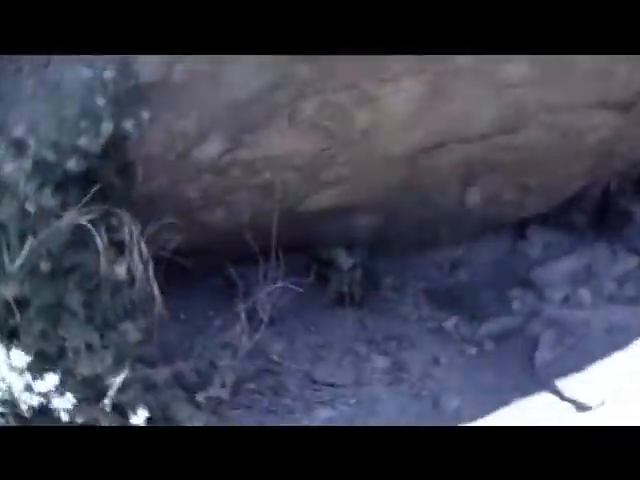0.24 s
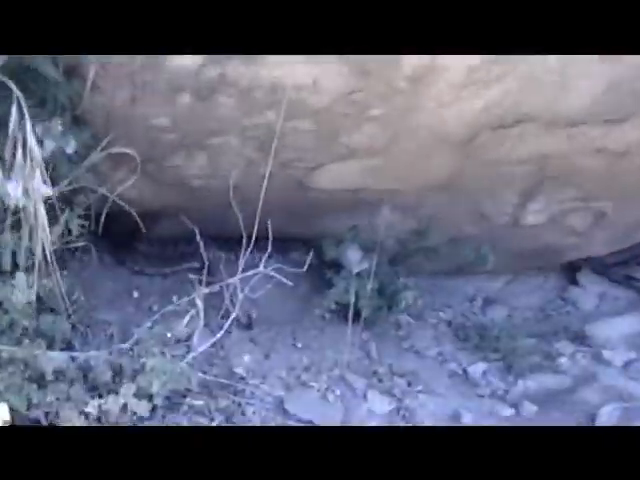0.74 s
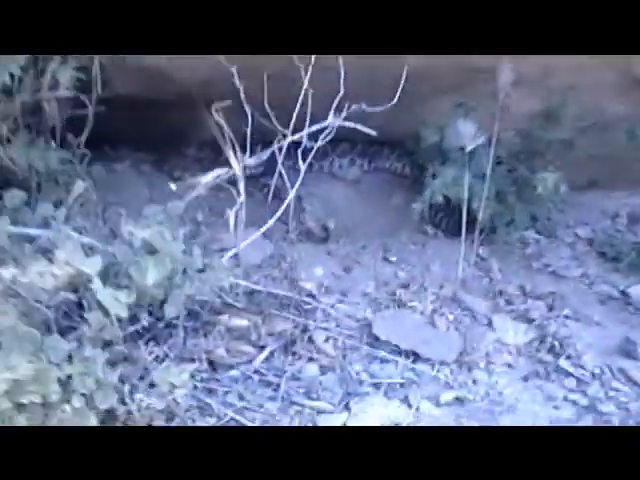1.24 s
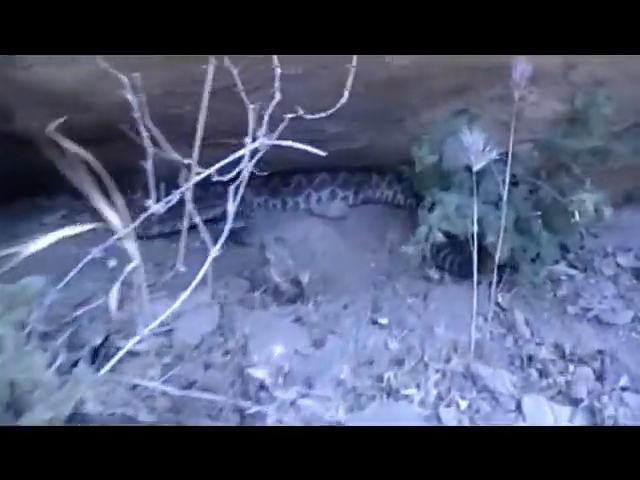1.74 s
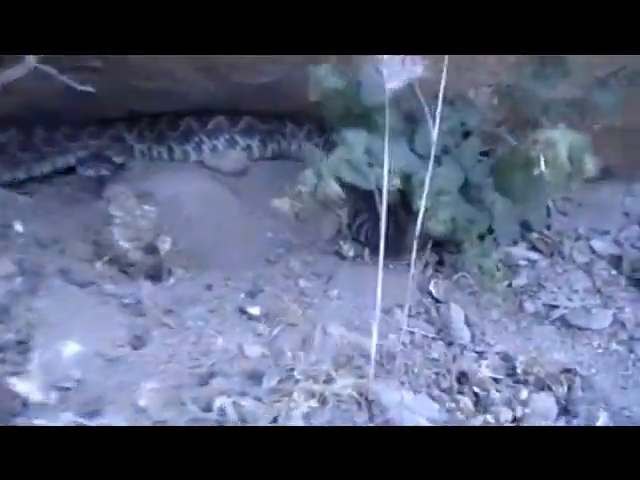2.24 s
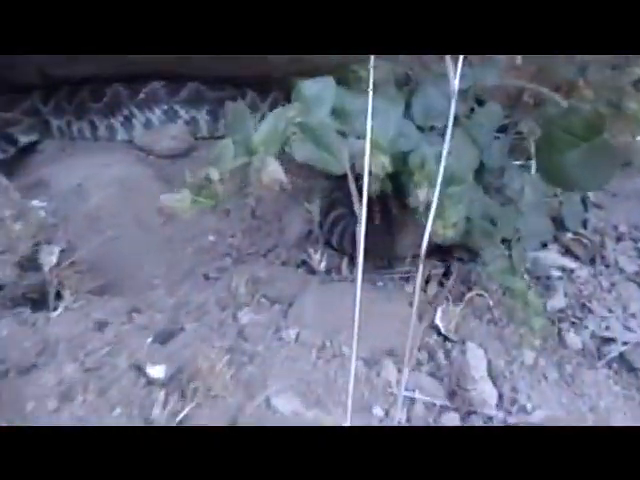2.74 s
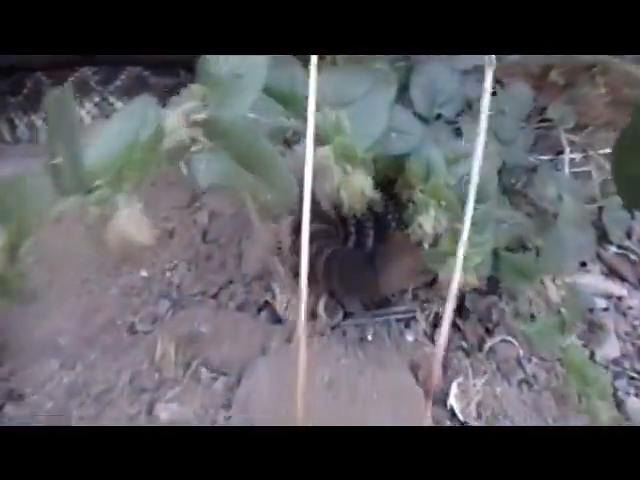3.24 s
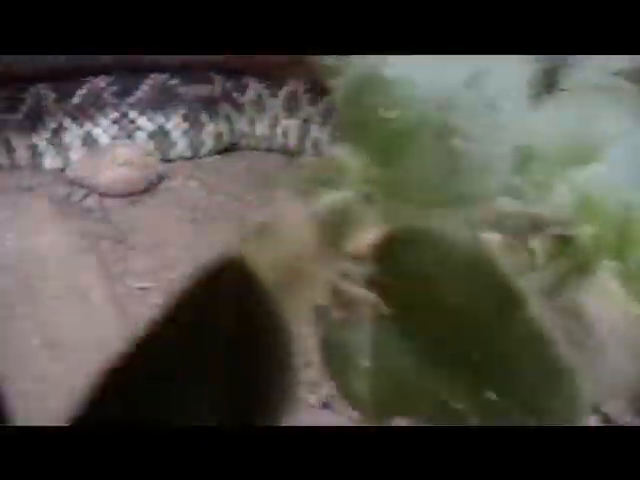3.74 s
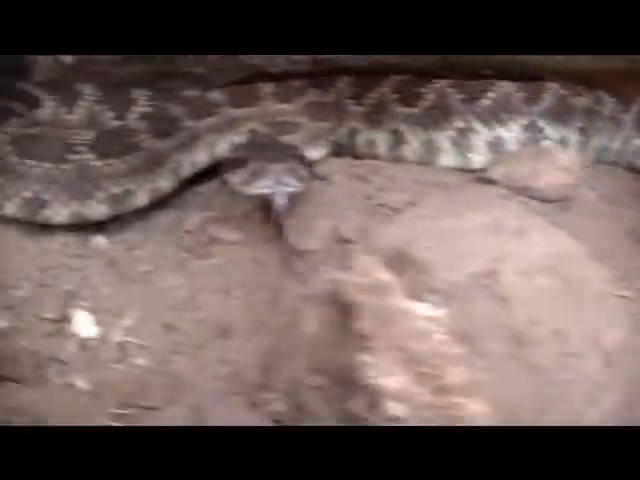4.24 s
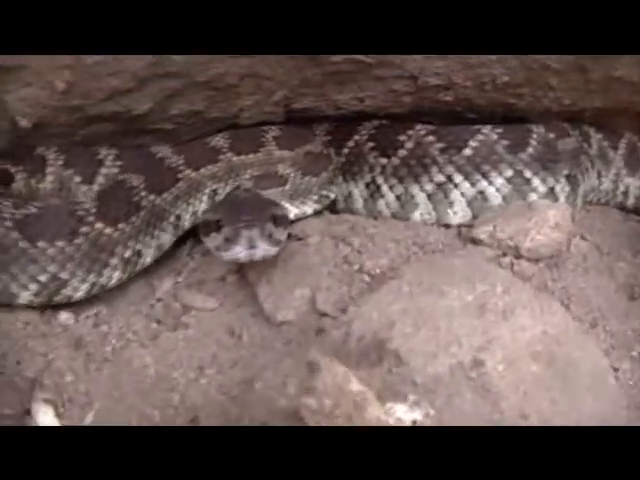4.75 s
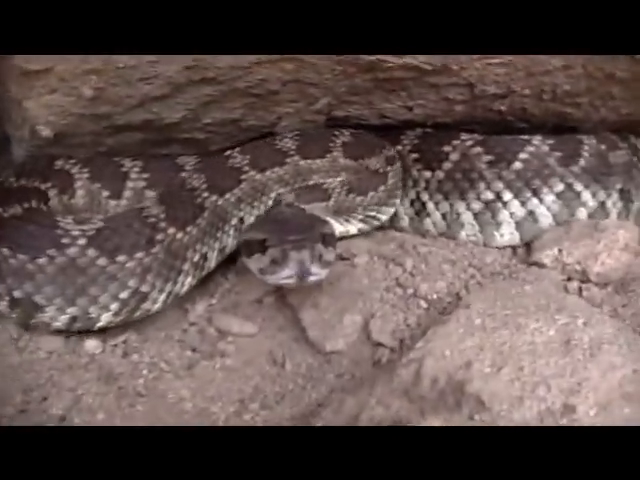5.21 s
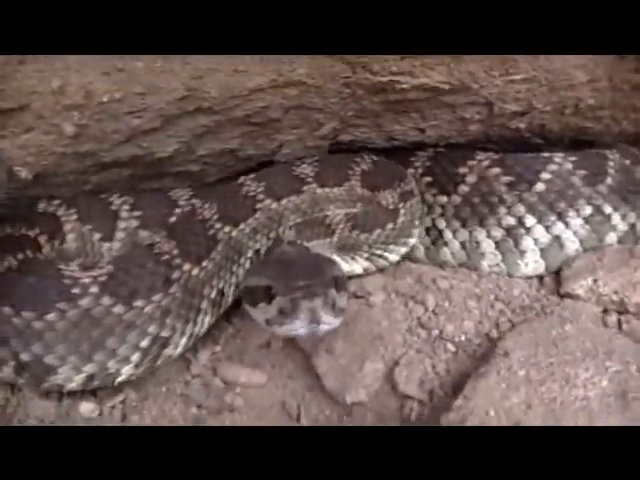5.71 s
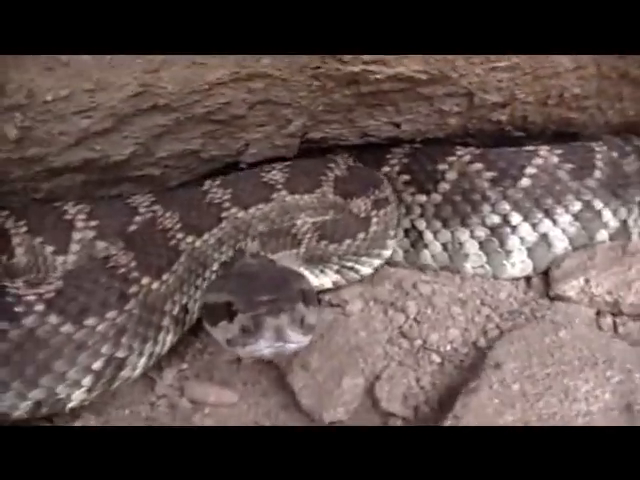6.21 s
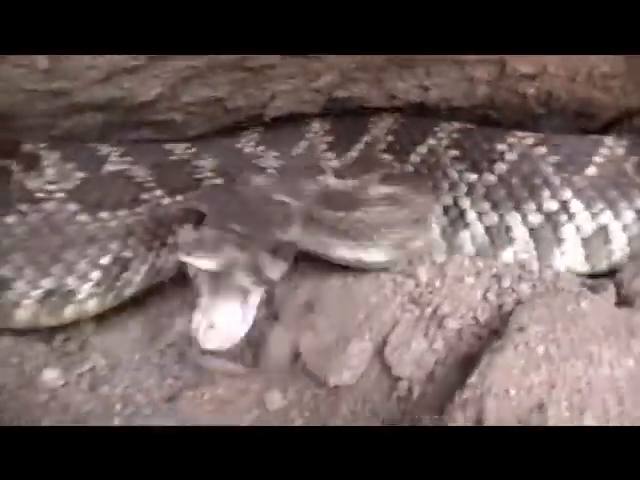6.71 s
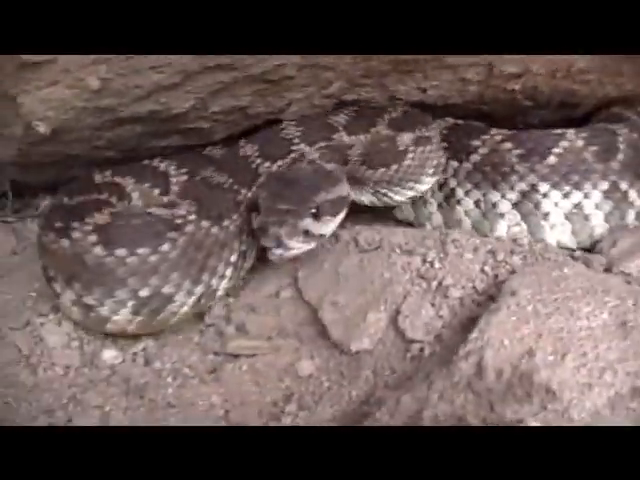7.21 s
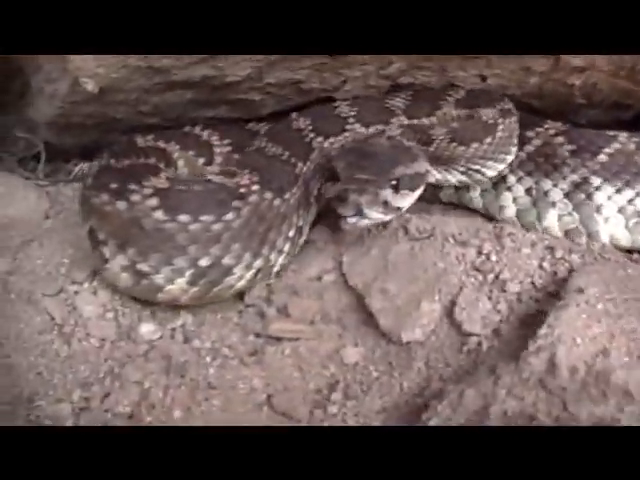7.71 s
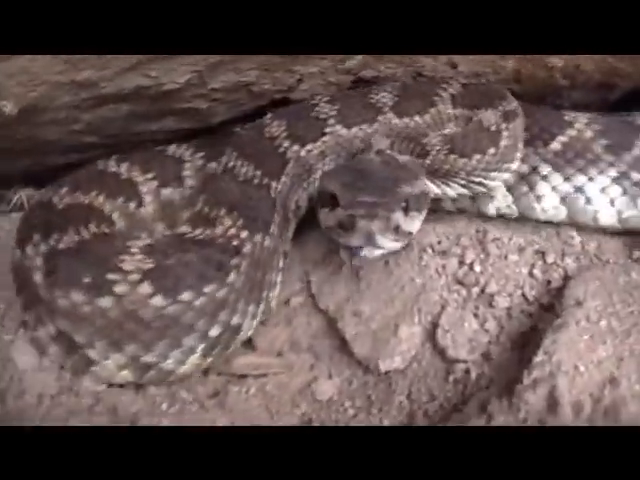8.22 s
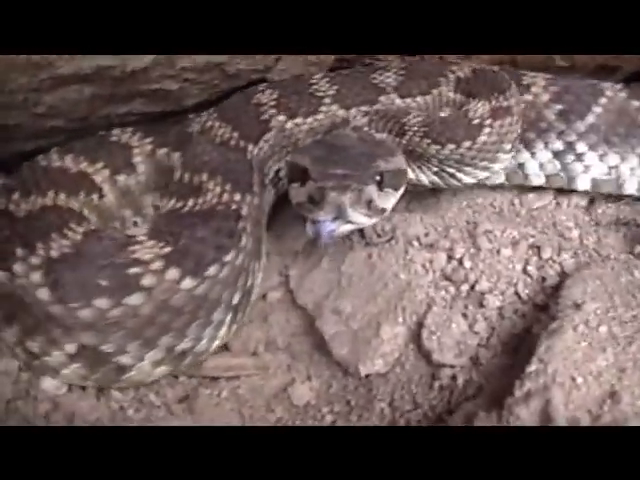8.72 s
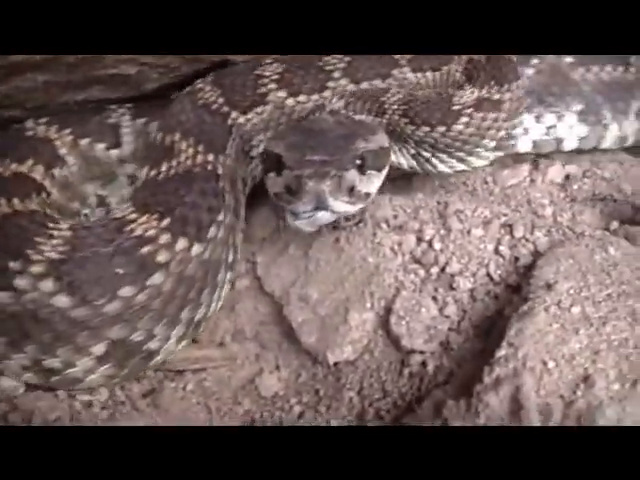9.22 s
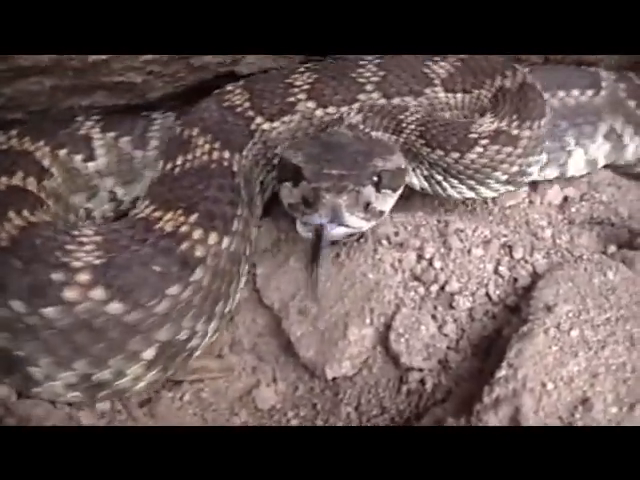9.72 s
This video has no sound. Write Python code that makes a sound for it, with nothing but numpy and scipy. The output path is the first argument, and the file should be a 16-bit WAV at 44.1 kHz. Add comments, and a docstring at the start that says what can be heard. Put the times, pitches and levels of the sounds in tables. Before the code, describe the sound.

Outdoors under a rock ledge, a rattlesnake shakes its tail nonstop: a fast, dry, bright buzz like hissing seeds. It starts thinner and farther away, then grows louder over the first few seconds as the handheld microphone approaches. Faint low air rumble, handling murmurs and tiny dirt scuffs lie beneath. After six seconds a very short, hard clatter strikes near the microphone, the level dips for an instant, and the rattle continues.

```python
"""A rattlesnake under a rock ledge shakes its tail without a pause while a hand-held camera creeps up to it.
Hollow horny segments clash on every stroke: each clash is a click and a dying spray of noise.
Echoes off ground and rock are drawn as notches that slide through the buzz.
The snake strikes once: noise cracks and ringing modes of the casing, and gain control ducks for a moment.
Behind it lie lumpy noise from moving air, scuffs on the dirt, murmurs of the hand and one faint tone."""
import sys
import numpy as np
from scipy import signal
from scipy.io import wavfile
from scipy.ndimage import uniform_filter1d

SR = 44100
rng = np.random.default_rng(int(sys.argv[2]) if len(sys.argv) > 2 else 0)


def transcribe(signal):
    """Save signal, clipped to [-1, 1], as a 16-bit WAV file at the path in sys.argv[1]."""
    frames = np.atleast_2d(signal).T
    limited = np.clip(frames, -1, 1)
    pcm = np.round(limited * 32767).astype(np.int16)
    wavfile.write(sys.argv[1], SR, pcm)


N = 439236
TIME = np.arange(N) / SR


def gain_of(db):
    """Decibels to amplitude."""
    return 10 ** (np.asarray(db) / 20)


def evened(x):
    """Scales to rms 1."""
    return x / np.sqrt(np.mean(x ** 2) + 1e-20)


def steadied(voice, window_s=.2):
    """Holds the running rms of the mid channel at 1."""
    power = uniform_filter1d(voice[0] ** 2, round(window_s * SR))
    return voice / np.sqrt(abs(power) + 1e-14)


def curves(rows, t=TIME):
    """Each column of a table, joined by straight lines in time."""
    s, *columns = np.transpose(rows)
    return [np.interp(t, s, column) for column in columns]


def outline(points, hz):
    """Reads a (Hz, dB) outline on a log-frequency axis."""
    f, db = np.transpose(points)
    return np.interp(np.log(hz + 1), np.log(f), db)


def coloured(x, points, size=4096):
    """Causal minimum-phase filter with the given outline."""
    log_gain = np.log(gain_of(outline(points, abs(np.fft.fftfreq(size, 1 / SR)))))
    taps = np.fft.ifft(np.exp(signal.hilbert(log_gain).conj())).real
    return signal.oaconvolve(x, taps[:size // 2])[:len(x)]


def bell(x, centre, width):
    """Bell curve of height 1."""
    return np.exp(-.5 * ((x - centre) / width) ** 2)


def swell(s, length):
    """A smooth rise and fall around a moment."""
    return np.cos(np.pi * np.clip((TIME - s) / length, -.5, .5)) ** 2


def wander(t, per_s, size=256):
    """Random drift of about unit size, with a new value so many times a second."""
    return np.interp(t * per_s, np.arange(size), rng.standard_normal(size))


def add(mix, s, sound):
    """Mixes a sound in at a time."""
    part = mix[round(s * SR):][:len(sound)]
    part += sound[:len(part)]


def low_noise(colour, apart=0.18, left_db=1, right_db=-1):
    """Soft noise, nearly alike at both ports and stronger at the left one."""
    mid, side = (evened(coloured(rng.standard_normal(N), colour)) for _ in range(2))
    left = gain_of(left_db) * (mid + apart * side)
    right = gain_of(right_db) * (mid - apart * side)
    return np.array([left, right])


# colour of the low air rumble: pitch_hz, level_db
RUMBLE_COLOUR = [(20, -24), (50, -16.5), (90, -5), (115, -6), (143, 2), (190, -1.5), (260, -2.5),
                 (340, -17), (600, -31.5)]
# colour of the softer rustle above it: pitch_hz, level_db
RUSTLE_COLOUR = [(180, -36.5), (290, 1), (325, 2), (365, 0.5), (480, -1), (650, -5.5), (900, -8),
                 (1400, -25.5), (3000, -24)]
# soft swells of air and handling noise: middle_s, length_s, rumble_db, rustle_db
AIR_SWELLS = [(0.277, 0.78, -68, -48), (1.207, 3.5, -58, -52), (1.762, 1.4, -53, -53),
              (2.296, 0.44, -52, -46.5), (2.794, 1.4, -51.5, -55.5), (4.884, 0.91, -48.5, -58),
              (6.126, 0.45, -55, -65), (8.804, 3.6, -53.5, -51), (9.5, 0.88, -48, -57)]
RUMBLE_FLOOR_DB, RUSTLE_FLOOR_DB = -54, -59.5
GUST_DB, GUSTS_PER_S = 2.5, 14  # the low noise comes in small lumps


def air():
    """A low rumble and rustle of filtered noise, with lumpy swells from moving air."""
    rumble_power, rustle_power = gain_of(RUMBLE_FLOOR_DB) ** 2, gain_of(RUSTLE_FLOOR_DB) ** 2
    for s, length, rumble_db, rustle_db in AIR_SWELLS:
        shape = swell(s, length)
        rumble_power = rumble_power + (gain_of(rumble_db) * shape) ** 2
        rustle_power = rustle_power + (gain_of(rustle_db) * shape) ** 2
    gusts = gain_of(GUST_DB * wander(TIME, GUSTS_PER_S))
    rumble = np.sqrt(rumble_power) * low_noise(RUMBLE_COLOUR)
    rustle = np.sqrt(rustle_power) * low_noise(RUSTLE_COLOUR)
    return gusts * (rumble + rustle)


# one faint tone: middle_s, length_s, pitch_hz, level_db (rms at the top of the swell)
FAINT_TONE = (3.2, 2.2, 275, -58)


def faint_tone():
    """A soft sine that swells and fades."""
    s, length, hz, db = FAINT_TONE
    return gain_of(db) * np.sqrt(2) * swell(s, length) * np.sin(2 * np.pi * hz * TIME)


# the hand shifts on the camera and the casing murmurs: middle_s, length_s, pitch_hz, level_db (before the port gains)
HAND_SHIFTS = [(.25, 0.78, 245, -46), (0.303, 0.62, 547, -46), (1.75, 0.78, 175, -49),
               (2.55, .45, 179, -50), (2.95, 0.64, 130.6, -48), (4.88, .55, 365, -52.5),
               (8.9, 2.2, 305, -55)]
GRIP_VALUES_PER_S = 70  # random levels per second, which blur each pitch into a narrow band


def grips(left_db=1, right_db=-3):
    """Each shift of the hand is a narrow rumble: a sine at its own pitch with a randomly wandering level."""
    rumble = np.zeros(N)
    for s, length, hz, db in HAND_SHIFTS:
        blurred = wander(TIME, GRIP_VALUES_PER_S, size=2048) * np.sin(2 * np.pi * hz * TIME)
        rumble += gain_of(db) * np.sqrt(2) * swell(s, length) * blurred
    return gain_of([[left_db], [right_db]]) * rumble


# small scuffs on the dirt: start_s, level_db, length_s
DIRT_SCUFFS = [(1.4, -45, 0.087), (1.512, -47, 0.031), (1.894, -44, 0.036), (2.01, -43, 0.025),
               (2.257, -51, 0.066), (8.021, -46, 0.049)]
# colour of the gritty dirt: pitch_hz, level_db
DIRT_COLOUR = [(80, -18), (200, -16), (600, 1), (900, -3), (1400, 2), (3000, -22), (8000, -35)]


def scuffs():
    """Short gritty swells of noise from the dirt."""
    envelope = np.zeros(N)
    for s, db, length in DIRT_SCUFFS:
        add(envelope, s, gain_of(db) * np.hanning(round(length * SR)))
    return envelope * evened(coloured(rng.standard_normal(N), DIRT_COLOUR))


# the strike clatters on the camera, before the colour and the trims in strike():
# start_s, crack_db, thump_db, crack_decay_ms (time constant), crack_treble_db
STRIKE_KNOCKS = [(6.427, 8, -7, 2, -8), (6.431, 11, -3, 1.4, -11), (6.4345, -2, -3, 4, 0),
                 (6.4402, 5, -6, 1.3, -2), (6.442, 8, -4, 1.4, 1), (6.4445, -1, -14, 5, 0),
                 (6.4492, 4, -17, 1.4, -2), (6.4507, 8, -11, 1.1, -2), (6.4532, 6, -9, 1.2, -2),
                 (6.4555, 3, -21, 4.5, -6), (6.4685, 2, -21, .9, 1)]
# colour of the cracks: pitch_hz, level_db
CRACK_COLOUR = [(100, -9), (480, -10), (800, -13), (1400, -5), (2200, -17), (2700, -9), (4300, -1.5),
                (5500, -5.5), (7700, -7.5), (9500, -4), (13000, -13)]
# ringing modes of the camera casing: pitch_hz, level_db, t60_s
CASING_MODES = [(142, -4, .038), (240, -10, .025), (335, -6.5, .042), (450, -12, .03), (900, -22, .049),
                (1350, -11, .0088)]
TREBLE_HZ = 5260  # the treble of a crack lies above this


def strike(crack_db=0.0, thump_db=1, left_db=2, right_db=-4, right_lag_rad=0.45, low_cut_hz=110, size=4000):
    """A quick cluster of noise cracks, each of which also rings the camera casing, most of all at the left port."""
    t, cracks, thumps = TIME[:size], np.zeros(N), np.zeros((2, N))
    rings = []
    for port_db, lag in ((left_db, 0), (right_db, right_lag_rad)):
        modes = [gain_of(db - 60 * t / t60) * np.sin(2 * np.pi * hz * t - lag) for hz, db, t60 in CASING_MODES]
        rings.append(gain_of(port_db) * sum(modes))
    below = signal.butter(6, TREBLE_HZ, fs=SR, output="sos")
    for s, sharp_db, dull_db, decay_ms, treble_db in STRIKE_KNOCKS:
        crack = rng.standard_normal(size) * np.exp(-1000 * t / decay_ms)
        body = signal.sosfiltfilt(below, crack, padtype=None)
        treble = crack - body
        add(cracks, s, gain_of(sharp_db) * (body + gain_of(treble_db) * treble))
        for port, ring in zip(thumps, rings):
            add(port, s, gain_of(dull_db) * ring)
    thumps = signal.sosfilt(signal.butter(2, low_cut_hz, "high", fs=SR, output="sos"), thumps)
    return gain_of(crack_db) * coloured(cracks, CRACK_COLOUR) + gain_of(thump_db) * thumps


# alarms that quicken the tail: start_s, added_strokes_per_s, rise_s
TAIL_ALARMS = [(.25, 4.47, 0.49), (3.6, 4.22, 0.42), (4.551, 2.6, 0.33), (6.42, 8.5, .08),
               (7.499, 1.96, 0.98)]
# tail strokes, two to a full shake: a resting pace, to which the tail sinks back after each alarm
REST_STROKES_PER_S, CALM_S = 107, .5


def pace():
    """Tail strokes per second: each alarm speeds the tail up, then it calms exponentially."""
    strokes_per_s = np.full(N, float(REST_STROKES_PER_S))
    for s, added, rise in TAIL_ALARMS:
        quicken = np.clip((TIME - s) / rise, 0, 1)
        calm = np.exp(-np.maximum(TIME - s - rise, 0) / CALM_S)
        strokes_per_s += added * quicken * calm
    return strokes_per_s


# segment clashes within one shake, out and back: share_of_shake, crisp_db, bright_db, hollow_db
SHAKE_CLASHES = [(.03, 1, -5, -10), (.092, -1.5, 3, -3), (.17, -4.5, -5, 3), (.262, 0, -2, -7),
                 (.53, 1, -5, -9), (.592, -1.5, 3, -4), (.67, -4, -5, 2), (.762, 0, -2, -6)]
# the tail favours first the outward stroke, later the return:
# time_s, accent_db (gain of the outward opening clashes and loss of the returning ones)
STROKE_ACCENT = [(4.3, 1.45), (5.2, -1.5)]
OPENING_SHARE = .25  # clashes this early in a stroke open it


def clashes(jitter=.005, stroke_jitter=.003, clash_db=.4, stroke_db=.4):
    """Sample index and random force of each clash, one row per shake; jitters are shares of a shake."""
    shakes = np.cumsum(pace() / 2) / SR
    count, share = int(shakes[-1]) + 1, np.transpose(SHAKE_CLASHES)[0]
    # chance for each clash, then for each whole shake
    slip, force = rng.standard_normal((count, 2, len(SHAKE_CLASHES))).transpose(1, 0, 2)
    late, vigour = rng.standard_normal((2, count, 1))
    due = np.arange(count)[:, None] + share + jitter * slip + stroke_jitter * late
    at = np.searchsorted(shakes, due)
    opening = share * 2 % 1 < OPENING_SHARE
    outward = np.sign(.5 - share)
    accent_db = opening * outward * curves(STROKE_ACCENT, at / SR)[0]
    heard = (at < N) * (at > 0)
    return np.minimum(at, N - 1), gain_of(accent_db + clash_db * force + stroke_db * vigour) * heard


def shell(at, force, decay_s, scrape_db, click_db, alike=False):
    """Each clash is a clean click and a quickly dying spray of noise, with faint scraping between; mid and side.
    Clicks that push alike on every shake add up to faint overtones of the tail's pace."""
    blows = np.bincount(at.ravel(), force.ravel() ** 2, N)
    power = signal.lfilter([1], [1, -np.exp(-2 / (decay_s * SR))], blows)
    level = np.sqrt(power / power.mean() + gain_of(scrape_db) ** 2)
    spray = level * rng.standard_normal((2, N))
    push = rng.choice([-1, 1], (2, N))
    if alike:
        push[0] = 1
    return spray + gain_of(click_db) * evened(np.sqrt(blows)) * push


# the echo off the ground as the camera moves: time_s, lag_ms behind the direct sound, strength (share of depth)
GROUND_ECHO = [(0, .455, .2), (.75, .47, .6), (1.2, .476, .65), (1.7, .485, .75), (2.4, .487, .5),
               (2.6, .52, .1), (2.95, .64, .1), (3.2, .66, .45), (3.8, .668, .5), (4.0, .6, .5),
               (4.2, .51, .6), (4.42, .445, .7), (4.7, .447, .7), (5.0, .393, .75), (5.7, .369, .75),
               (6.35, .37, .9), (6.6, .368, .7), (6.9, .395, .6), (7.5, .395, .8), (7.85, .38, .95),
               (8.3, .378, .7), (8.75, .347, .45), (9.96, .342, .5)]
# it cancels pitches that it delays by about an odd number of half cycles: lag_cycles, half_width_cycles, depth_db
GROUND_COMB = [(2.56, .075, 11), (3.47, .075, 11), (5.24, .08, 6)]
# close to the snake all ground notches but the first fade: time_s, share
UPPER_COMB_FADE = [(4.9, 1), (5.8, 0.035)]
# sliding notches, depths before wavering and ECHO_DEPTH; each: time_s, centre_hz, half_width_hz, depth_db
# (a depth below 0 is silent); two from the overhanging ledge and the rocks around
LEDGE = [(0, 11400, 600, 8), (.75, 10700, 400, 7), (1.0, 9300, 280, 8), (1.22, 8000, 170, 11),
         (1.6, 8150, 200, 8), (2.0, 7850, 170, 9), (2.3, 7950, 190, 9), (2.65, 7400, 190, 11),
         (3.2, 7050, 160, 11), (3.75, 7000, 160, 11), (4.0, 7500, 190, 10), (4.33, 9250, 230, 7),
         (4.65, 9700, 230, 5), (5.0, 11300, 240, 7), (5.5, 11500, 240, 4), (5.9, 12500, 240, 0)]
SLAB = [(.5, 12600, 250, 2), (1.0, 11400, 230, 6), (1.35, 10350, 200, 6), (1.9, 9800, 200, 6),
        (2.35, 8600, 260, 6), (2.7, 8300, 350, 4), (3.2, 8050, 300, 6), (3.75, 7900, 300, 6),
        (4.2, 10400, 250, 3), (4.6, 12300, 250, 2), (5, 12800, 250, 0)]
# a third from the rocks, near 4 to 4.5 kHz early and 5.5 kHz late: same columns
ROCK = [(0, 4500, 350, 3), (1.0, 4000, 200, 6), (1.5, 4200, 200, 1), (2.3, 4200, 170, 3),
        (2.85, 3950, 160, 6), (3.3, 3950, 150, 0), (6.5, 5400, 300, 0), (7.7, 5500, 250, 4),
        (8.3, 5430, 130, 13), (9.1, 5500, 130, 15), (9.96, 5620, 130, 12)]
# three from the surrounding rock: same columns
LOW = [(0, 1910, 485, 17), (1.2, 1920, 313, 1), (4.2, 2020, 213, 9), (5.1, 2030, 152, 14),
       (5.7, 2070, 150, 15), (6.3, 2070, 126, 39), (6.7, 2080, 142, 20), (7.6, 2070, 180, 6.5),
       (8.4, 2160, 173, 14), (9.96, 2178, 194, 15)]
MID = [(0, 5400, 300, 8), (.7, 5200, 280, 5), (1.2, 5200, 200, 2), (2.4, 5100, 170, 0), (2.8, 5150, 170, 5),
       (3.9, 5170, 182, 3), (4.5, 4700, 200, 0), (5.0, 4700, 250, 6), (5.5, 4900, 250, 8),
       (6.35, 5250, 220, 11), (6.7, 4750, 170, 10), (7.1, 4300, 170, 8), (7.5, 4400, 230, 7),
       (7.8, 4850, 210, 10), (8.5, 4680, 220, 12), (9.96, 4900, 230, 16)]
HIGH = [(0, 8300, 330, 12), (.65, 8300, 280, 2), (1.35, 8950, 200, 4), (1.8, 8600, 200, 10),
        (2.35, 8300, 200, 3.5), (5.3, 7500, 250, 0), (5.8, 7500, 250, 2), (6.5, 7600, 250, 7),
        (6.9, 7500, 200, -7), (7.8, 7600, 199.8, -4), (8.4, 7400, 250, 9.5), (8.8, 8220, 250, 4),
        (9.96, 8800, 249, 9)]
# a notch from the ground, sliding between about 2.5 and 4.3 kHz: same columns
GROUND_SLIDE = [(.5, 3000, 250, -3), (1.2, 3170, 251, 6), (1.8, 3020, 320, 7), (2.3, 2650, 320, 8.5),
                (2.9, 2460, 220, 4.5), (3.8, 2550, 198, 1.5), (4.4, 3350, 251, 9), (4.8, 3540, 250, 6),
                (5.15, 4000, 300, 8.5), (6.1, 4270, 300, 1.5)]
# a shallow notch high up, close to the snake: same columns
TOP = [(4.7, 9400, 350, 0), (5.0, 9500, 350, 7), (5.5, 9450, 400, 6), (5.85, 11100, 400, 2),
       (7.2, 11100, 300, 0.5), (9.96, 11300, 500, 3)]
ECHO_DEPTH = 1.3  # scales every notch depth
SCATTER_HZ = 12500  # rough ground scatters the treble above this, so the ground comb fades
# the hand and the tail tremble, so the sliding notches waver in pitch and in depth
WAVERS_PER_S, WAVER_HZ, WAVER_SHARE = 11, 35, .28


def reflected(hz, t):
    """Loss in dB per frequency and moment: a comb from the ground echo, and single wavering notches."""
    lag_ms, strength = curves(GROUND_ECHO, t)
    cycles = hz * lag_ms / 1000
    unscattered = 1 / (1 + (hz / SCATTER_HZ) ** 10)
    first, *higher = [depth_db * bell(cycles, centre, width) for centre, width, depth_db in GROUND_COMB]
    loss = strength * unscattered * (first + curves(UPPER_COMB_FADE, t)[0] * sum(higher))
    for notch in (LEDGE, SLAB, LOW, GROUND_SLIDE, MID, ROCK, HIGH, TOP):
        centre, width, depth_db = curves(notch, t)
        depth_db = depth_db * (1 + WAVER_SHARE * wander(t, WAVERS_PER_S))
        centre = centre + WAVER_HZ * wander(t, WAVERS_PER_S)
        loss = loss + np.maximum(depth_db, 0) * bell(hz, centre, width)
    return ECHO_DEPTH * loss


WIDEN_DB_PER_DB = 11.5  # the further a sound leans left, the less alike the ports are


def ports(voice, lean_db=0):
    """Mid and side to left and right; a sound that leans left also widens."""
    mid, side = voice[0], voice[1] * gain_of(WIDEN_DB_PER_DB * lean_db)
    return np.array([(mid + side) * gain_of(lean_db / 2), (mid - side) * gain_of(-lean_db / 2)])


# level of the rattle as the camera creeps closer: time_s, treble_db (crisp and bright clashes), hollow_db, dull_db
APPROACH = [(0.0, -28.5, -39, -51.5), (0.6, -26, -38.5, -53), (1.2, -26, -36.5, -50),
            (1.9, -22, -31, -46.5), (2.4, -19.5, -28.5, -45.5), (3.551, -18.5, -29.5, -47.5),
            (4.0, -20.5, -30.0, -44.5), (4.45, -20.5, -31.5, -41), (5.1, -19.5, -36.5, -44),
            (6.35, -20.5, -34, -44.5), (7.0, -19.5, -33, -43.5), (7.7, -21, -34.5, -45.5),
            (8.8, -20.5, -31.5, -45.5), (9.96, -19, -30.5, -47)]
# colour of the clashing segments: pitch_hz, level_db
SHELL_COLOUR = [(60, -39), (320, -23.5), (800, -31), (1150, -24), (1500, -18), (2100, -12.5), (2800, -17),
                (3250, -12.5), (3750, -6.5), (4200, -9), (4700, -9), (5600, -7), (6400, -4.5), (7700, -3),
                (8600, -1), (9800, 0.3), (10600, -0.8), (11400, -3), (12500, -5)]
# stereo width of the rattle: pitch_hz, side_db (before the lean widens the treble)
SIDE_WIDTH = [(1000, -71), (2300, -33), (4000, -12.5), (6000, -69), (8000, -32), (10000, -19),
              (12500, -30.5)]
# how far the treble leans to the left port: time_s, left_minus_right_db
TREBLE_LEAN = [(0, -1), (3.7, 0.5), (4.2, 1.1), (5.3, 0.9), (5.7, 1.5), (8, 1.06), (9.96, 0.74)]


def rattle():
    """Crisp and bright clashes, hollow ring and dull chatter of the same segments, heard among the rocks."""
    at, force = clashes()
    _, crisp_db, bright_db, hollow_db = np.transpose(SHAKE_CLASHES)
    dull_db = (bright_db + hollow_db) / 2
    crisp = shell(at, force * gain_of(crisp_db), decay_s=0.0022, scrape_db=-10.0, click_db=-14)
    bright = shell(at, force * gain_of(bright_db), decay_s=0.0022, scrape_db=-7.5, click_db=-6)
    hollow = shell(at, force * gain_of(hollow_db), decay_s=0.0031, scrape_db=-5.5, click_db=-5)
    dull = shell(at, force * gain_of(dull_db), decay_s=0.003, scrape_db=1.0, click_db=-3, alike=True)
    hz, t, spectra = signal.stft(np.array([crisp, bright, hollow, dull]), SR, nperseg=640)
    hz = hz[:, None]
    # each voice holds its own register, with soft borders
    top, high, middle = (np.clip((hz - edge) / 400 + .5, 0, 1) for edge in (7300, 5300, 2500))
    spectra *= np.sqrt([top, high - top, middle - high, 1 - middle])[:, None]
    spectra *= gain_of(outline(SHELL_COLOUR, hz) - reflected(hz, t))
    spectra[:, 1] *= gain_of(outline(SIDE_WIDTH, hz))
    crisp, bright, hollow, dull = signal.istft(spectra, SR)[1][..., :N]
    treble_db, hollow_db, dull_db = curves(APPROACH)
    treble = gain_of(treble_db) * steadied(crisp + bright)
    hollow = gain_of(hollow_db) * steadied(hollow)
    dull = gain_of(dull_db) * steadied(dull)
    return ports(treble, curves(TREBLE_LEAN)[0]) + ports(hollow + dull)


def scene():
    """Everything at the two microphone ports."""
    return air() + faint_tone() + grips() + scuffs() + strike() + rattle()


CEILING_DB, EDGE_HZ = -2.5, 12990  # peak level above which the gain ducks; upper band limit


def record(dry, recover_db_per_s=70, attack_s=.003, overload=.68):
    """Gain control ducks within moments and recovers steadily, loud peaks overload softly; then the band limit."""
    peak_db = 20 * np.log10(abs(dry).max(0) + 1e-9)
    fall = TIME * recover_db_per_s
    held_db = np.maximum.accumulate(peak_db + fall) - fall
    over_db = np.maximum(held_db - CEILING_DB, 0)
    keep = np.exp(-1 / (attack_s * SR))
    ducked = dry / gain_of(signal.lfilter([1 - keep], [1, -keep], over_db))
    clipped = ducked / (1 + (ducked / overload) ** 4) ** .25
    band_limit = signal.firwin(1201, EDGE_HZ, window=("kaiser", 8), fs=SR)
    return signal.oaconvolve(clipped, band_limit[None], "same")


dry = scene()
out = record(dry)
transcribe(out)
```